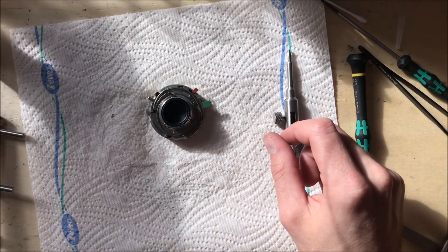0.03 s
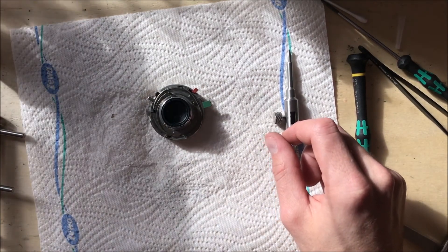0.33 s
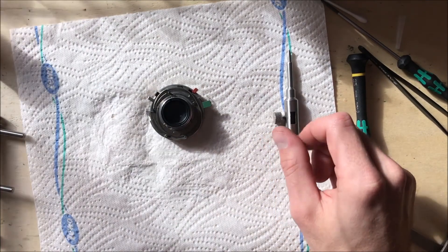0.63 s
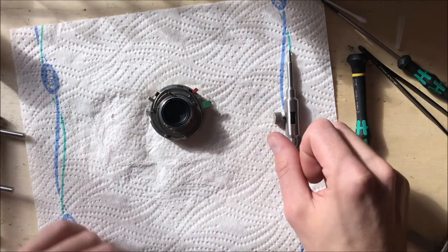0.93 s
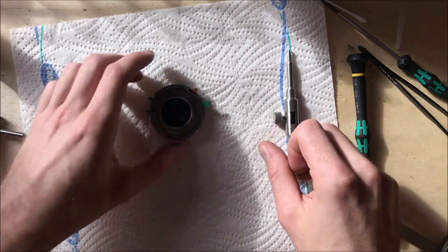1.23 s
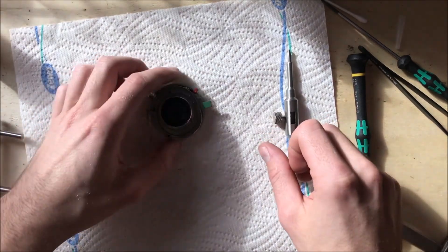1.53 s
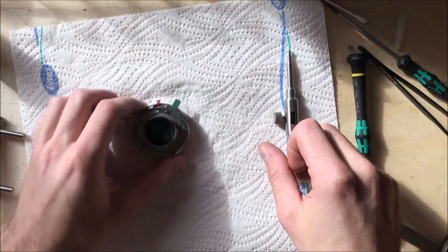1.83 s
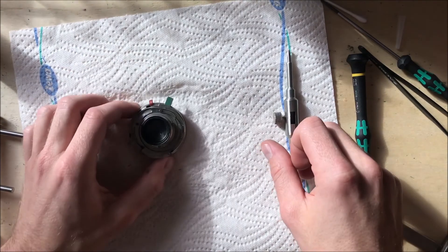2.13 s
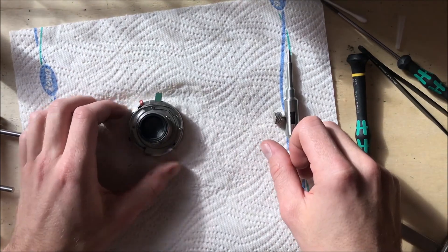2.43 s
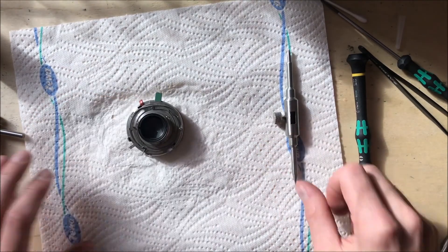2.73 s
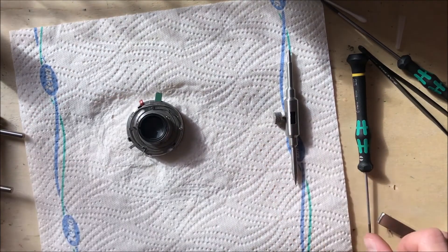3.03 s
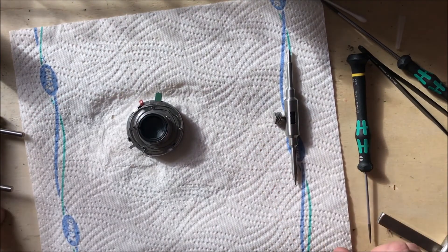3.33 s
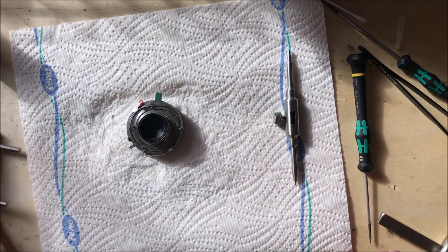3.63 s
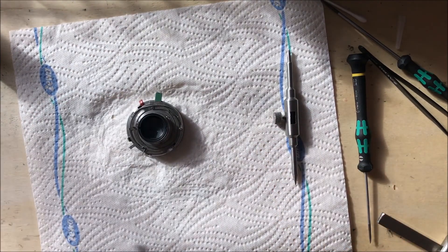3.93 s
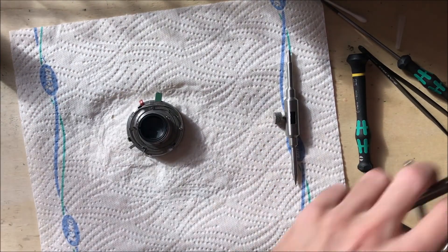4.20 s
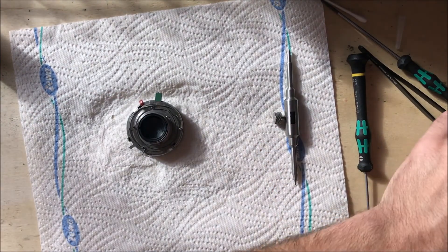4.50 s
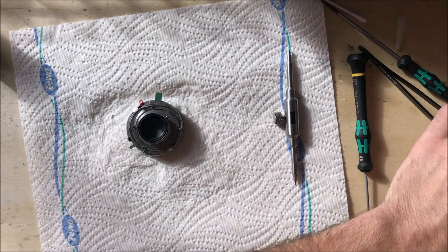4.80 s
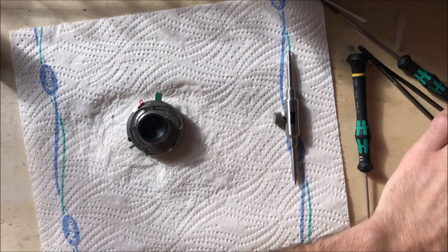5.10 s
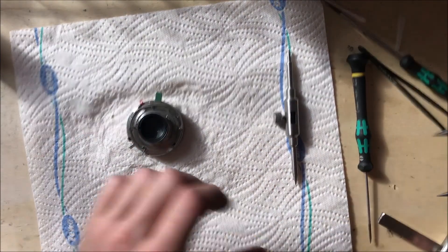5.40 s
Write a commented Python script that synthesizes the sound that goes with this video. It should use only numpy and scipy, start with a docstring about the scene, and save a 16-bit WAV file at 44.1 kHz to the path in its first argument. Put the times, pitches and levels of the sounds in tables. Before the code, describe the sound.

Small steel parts scrape and click in a quick cluster. A camera shutter is nudged over a paper towel with a soft tap and faint rustling, and things drag quietly across a wooden bench. Near the end a screwdriver rattles down among other tools, followed by a loud wooden knock and a last clack. The sounds are close, in a small room with a faint hum and hiss.

```python
"""Tools knock on a wooden repair bench, close by in a small room; the boards ring with low modes.
Small steel parts click, scrape and rock flat, and a screwdriver rattles down among other tools.
Things drag over the wood, and a hand nudges a camera shutter over a paper towel, whose fibres
hiss and tick. A faint, brief click sounds at the very start; a faint hum and hiss lie underneath."""
import sys
import numpy as np
from scipy import signal
from scipy.fft import rfft, irfft, next_fast_len
from scipy.io import wavfile
from scipy.ndimage import map_coordinates

SR = 44100
rng = np.random.default_rng(int(sys.argv[2]) if len(sys.argv) > 2 else 0)


def dump(signal):
    """Clip the signal to [-1, 1] and save it as 16-bit WAV at the path in sys.argv[1]."""
    limited = np.clip(np.atleast_2d(signal).T, -1, 1)
    pcm = np.round(limited * 32767).astype(np.int16)
    wavfile.write(sys.argv[1], SR, pcm)


N = 240556
TIME_S = np.arange(N) / SR
RING_S = np.arange(SR // 2) / SR  # time axis of one hit

# modes of small steel parts: freq_hz, level_db, t60_s
STEEL_MODES = [(1128, -8, 0.11), (1323, -6, 0.13), (1542, -1.5, 0.07), (2048, -2, 0.054),
               (2580, -1.5, 0.046), (2946, -2, 0.059), (3733, 6.5, 0.028), (4137, 4.5, 0.033),
               (4960, -2.5, 0.029), (5440, 2, 0.036), (5950, 1, 0.023), (7350, -9, 0.02),
               (10020, 3.5, 0.025), (10880, 0, 0.021), (12300, -9, 0.03)]
# paper towel friction spectrum: freq_hz, gain_db
TOWEL_SPECTRUM = [(200, -38), (1000, 3), (2800, 3), (4200, 3), (7000, 0.5), (10000, -2), (15000, 2)]


def knocks():
    """Tools and fingers strike the bench with some weight behind them."""
    # blunt contacts: start_s, knock_db, board_db, pitch_hz, damping (1 = free)
    contacts = [(0.144, -44.5, -58, 1230, 1.7), (0.2309, -46, -52, 1040, 2.3),
                (0.2336, -43, -42.5, 660, 2.8), (0.2391, -49, -67, 1120, 3), (0.344, -61, -54, 700, 2),
                (0.9017, -58, -87, 1630, 2), (0.9581, -64.5, -90, 1480, 2), (1.3414, -59.5, -70, 1190, 1.6),
                (2.614, -60, -43.5, 760, 1.3), (2.809, -63, -64, 920, 1.2), (3.1906, -69.5, -62, 1550, 3.4),
                (3.26, -64.5, -55, 1130, 2.3), (3.387, -51, -58.5, 1070, 1.2), (3.468, -72, -54, 790, 1.9),
                (3.513, -72, -55, 1000, 1.6), (3.731, -54, -75, 1400, 1.4), (4.9557, -17, -28, 1013, 1),
                (5.1258, -45, -51.5, 1290, 2.1), (5.3882, -49.5, -74, 1380, 1.5)]
    out = np.zeros(N)
    for start_s, knock_db, board_db, pitch_hz, damping in contacts:
        add(out, start_s, knock(knock_db, board_db, pitch_hz, damping) + thump(board_db, damping))
    return out


def knock(knock_db, board_db, pitch_hz, damping, contact_s=0.00006, board_rise_s=0.0025):
    """A cushioned contact gives a few cycles of knock; the boards ring on."""
    # knock spectrum at a pitch of 1000 Hz: freq_hz, gain_db
    spectrum = [(60, -17.5), (250, -16.5), (550, -9.5), (780, -2), (1000, 0.5), (1300, -3.5), (1620, -20),
                (2400, -24), (3500, -26), (5000, -42), (7000, -46.5), (15000, -51)]
    pulse = RING_S * np.exp(-RING_S / contact_s)
    push = pulse / pulse.sum() + amp(-30.5) * crack(t60_s=0.032)
    body = causal(push, lambda hz: along(spectrum, hz * 1000 / pitch_hz))
    # bending waves disperse in wood: the knock swells over its first cycle
    pole = np.exp(2 * np.pi * pitch_hz * (1j - .45) / SR)
    allpass = np.poly([pole, pole.conjugate()]).real
    body = unit_onset(signal.lfilter(allpass[::-1], allpass, body))
    board = boards(damping) * (1 - np.exp(-RING_S / board_rise_s))
    return amp(knock_db) * body + amp(board_db) * board


def thump(board_db, damping, cutoff_hz=154, offset_db=-6):
    """A slow, heavy push reaches only the lowest bench modes."""
    low = signal.sosfilt(signal.butter(3, cutoff_hz, fs=SR, output="sos"), boards(damping))
    return amp(board_db + offset_db) * low / np.abs(low).max()


def boards(damping):
    """The bench rings; a resting hand deadens and shifts its modes."""
    # bench top modes: freq_hz, level_db, t60_s
    modes = [(47.6, -27, 0.35), (128.3, -3.5, 0.26), (152.7, -2.5, 0.24), (187, -14.5, 0.25),
             (274, 6.5, 0.17), (318.7, -1, 0.15), (405, -1, 0.13), (437, -2.5, 0.09), (514, -7, 0.075),
             (588, -8.5, 0.091), (685, -10.5, 0.097), (772, -2.5, 0.1), (971, -5.5, 0.15),
             (1272, -3.5, 0.065), (1790, -18.5, 0.074), (2412, -10, 0.095), (3450, -23, 0.058)]
    hand_load = max(1 - 1 / damping, 0)
    return ring(modes, scatter_db=2, detune=0.04 * hand_load, damping=damping)


def landings(touch_count=4, weight_gain_db=10, thump_boost_db=3):
    """A part rocks flat: its knocks soften as its weight comes onto the boards."""
    # edge landings: start_s, settle_s, first_knock_db, fade_db, last_board_db, pitch_hz, damping
    parts = [(1.6794, 0.024, -40.5, 16, -40, 1280, 1.35), (5.432, 0.0138, -24.5, 32, -19, 976, 1.4)]
    out = np.zeros(N)
    for start_s, settle_s, first_knock_db, fade_db, last_board_db, pitch_hz, damping in parts:
        for progress in np.linspace(0, 1, touch_count):
            touch_s = start_s + settle_s * progress ** 1.4  # gaps widen
            knock_db = first_knock_db - fade_db * progress ** 4.5
            board_db = last_board_db - weight_gain_db * (1 - progress)
            hit = knock(knock_db, board_db, pitch_hz, damping)
            add(out, touch_s, hit + thump(board_db + thump_boost_db, damping))
    return out


def clicks(rise_db_per_oct=2.5, fall_db_per_oct=11, repeat_s=0.0093, repeat_loss_db=11):
    """Each click is a crack and a brief ring, repeated once more softly."""
    # a faint, brief click at the very start; the later ones are steel parts that rebound
    # clicks: start_s, level_db, peak_hz, t60_s
    events = [(0.005, -56, 3840, 0.03), (0.1024, -45, 7060, 0.01), (0.127, -44.5, 2510, 0.054),
              (0.1441, -38, 5460, 0.083), (0.1552, -39.5, 3370, 0.079), (0.209, -54.5, 4200, 0.027),
              (0.2353, -55.5, 5200, 0.03), (0.3214, -35.5, 3700, 0.021), (0.3424, -43.5, 4120, 0.04),
              (0.3749, -32.5, 4300, 0.023), (1.7032, -48.5, 5970, 0.019), (2.6123, -46.5, 4170, 0.07),
              (3.6046, -68.5, 12000, 0.008), (4.144, -66, 4660, 0.024), (5.1244, -56, 5130, 0.013),
              (5.4322, -30, 4600, 0.014), (5.4355, -30.5, 12400, 0.019)]
    out = np.zeros(N)
    for start_s, level_db, peak_hz, t60_s in events:
        def colour_db(hz):
            octaves = np.log2((hz + 1) / peak_hz)
            bass_cut_db = -10 * np.log10(1 + (950 / (hz + 1)) ** 6)
            return np.minimum(rise_db_per_oct * octaves, -fall_db_per_oct * octaves) + bass_cut_db
        for delay_s, loss_db in [(0, 0), (repeat_s, repeat_loss_db)]:
            hit = crack(t60_s) + amp(-5.5) * ring(STEEL_MODES, scatter_db=3.5, detune=0.015)
            add(out, start_s + delay_s, amp(level_db - loss_db) * unit_onset(causal(hit, colour_db)))
    return out


def screwdriver():
    """A dropped screwdriver chatters, its shaft and handle ring, the boards answer faintly."""
    # contacts with other tools: start_s, level_db
    taps = [(4.6342, -30.5), (4.638, -33), (4.658, -47), (4.6976, -46.5)]
    # chatter spectrum: freq_hz, gain_db
    spectrum = [(200, -31), (750, -12.5), (1080, -4.5), (1700, -4), (2900, 0.5), (3400, -10), (4100, -2.5),
                (5000, -10.5), (7000, -13.5), (9700, -16), (10600, -19.5), (16000, -25.5)]
    # screwdriver modes: freq_hz, level_db, t60_s
    modes = [(1082, 0, 0.045), (1330, 2, 0.022), (1830, -4, 0.05), (2433, 1, 0.045), (2902, 0, 0.04),
             (3000, 5, 0.022), (4020, -3, 0.03), (5367, -11, 0.035), (7100, -13, 0.03), (9152, -14, 0.04)]
    out = np.zeros(N)
    for start_s, level_db in taps:
        chatter = unit_onset(causal(crack(t60_s=0.034), lambda hz: along(spectrum, hz)))
        shaft = ring(modes, scatter_db=2.5, detune=0.005)
        tool = unit_onset(chatter + amp(-0.5) * shaft)
        add(out, start_s, amp(level_db) * (tool + amp(-31.5) * boards(damping=1)))
    return out


def steel_scrapes():
    """Steel sticks and slips on steel; the slips keep its modes ringing."""
    # slides: peak_s, rise_s, fall_s, level_db, cutoff_hz
    slides = [(0.075, 0.08, 0.017, -63, 5000), (0.091, 0.0095, 0.02, -42, 9400),
              (0.1002, 0.0036, 0.0076, -37.5, 14300), (2.305, 0.011, 0.028, -61.5, 3670),
              (5.381, 0.067, 0.039, -64.5, 4330)]
    # steel friction spectrum: freq_hz, gain_db
    spectrum = [(500, -22), (900, -26), (1200, -6), (1700, -14), (2600, 9), (3200, 2.5), (4150, 8),
                (5000, -4), (7500, 7), (9500, -11), (13000, -1), (16000, -23)]
    out = np.zeros(N)
    for peak_s, rise_s, fall_s, level_db, cutoff_hz in slides:
        slips = noise(spectrum) * unit(amp(4.2 * wobble(rate_hz=700)))
        response = ring(STEEL_MODES, scatter_db=2, detune=.01)
        ringing = unit(signal.fftconvolve(slips, response)[:N])
        scrape = filtered(slips + amp(-5.5) * ringing, lambda hz: 1 / np.sqrt(1 + (hz / cutoff_hz) ** 6))
        out += amp(level_db) * swell(peak_s, rise_s, fall_s) * unit(scrape)
    return out


def drags(attack_share=0.29, release_share=0.38):
    """Things catch unevenly on the wood; the boards drone most at mid-stroke, where pressure peaks."""
    # drag strokes: start_s, length_s, rub_db, drone_db
    strokes = [(1.805, 0.17, -66, -68.5), (2.14, 0.41, -70, -69), (2.548, 0.28, -63.5, -60.5),
               (3.328, 0.069, -59, -79), (3.427, 0.2, -65, -55.5), (3.582, 0.18, -53, -47.5),
               (4.597, 0.39, -56.5, -71), (5.386, 0.04, -49.5, -64)]
    # wood friction spectrum: freq_hz, gain_db
    rub_spectrum = [(200, -3.5), (500, -12), (1100, 2), (1600, -5), (2400, -9.5), (4500, -13), (8000, -22),
                    (16000, -29)]
    # board drone spectrum: freq_hz, gain_db
    drone_spectrum = [(30, -36), (90, -20), (122, 4), (155, -1), (195, -14), (240, 1), (280, 2), (340, -14),
                      (410, -8), (560, -22), (900, -26), (2000, -60)]
    rub_gain, drone_gain = np.zeros((2, N))
    for start_s, length_s, rub_db, drone_db in strokes:
        progress = (TIME_S - start_s) / length_s
        ramp = np.clip(np.minimum(progress / attack_share, (1 - progress) / release_share), 0, 1)
        speed = np.sin(np.pi / 2 * ramp) ** 2
        rub_gain += amp(rub_db) * speed
        drone_gain += amp(drone_db) * swell(start_s + length_s / 2, 0.2 * length_s, 0.2 * length_s)
    catching = unit(amp(2.2 * wobble(rate_hz=200) + 1.8 * wobble(rate_hz=45)))
    return rub_gain * catching * noise(rub_spectrum) + drone_gain * noise(drone_spectrum)


def paper_towel():
    """The towel hisses and crackles under the hand and the shutter."""
    # strokes over the paper: peak_s, rise_s, fall_s, level_db
    strokes = [(1.4, 0.14, 0.22, -72), (1.73, 0.068, 0.044, -67), (1.88, 0.065, 0.052, -63),
               (2.039, 0.032, 0.052, -65), (2.28, 0.05, 0.1, -72), (2.66, 0.099, 0.088, -55),
               (3.35, 0.058, 0.16, -65), (3.8, 0.062, 0.23, -74.5)]
    unsteady = amp(1.6 * wobble(rate_hz=45))
    pressure = unsteady * sum(amp(level_db) * swell(*timing_s) for *timing_s, level_db in strokes)
    return pressure * unit(noise(TOWEL_SPECTRUM) + amp(-3) * fibre_ticks())


def fibre_ticks(rate_hz=380, spread_db=4.5, t60_s=0.005):
    """Embossed paper fibres catch and let go at random."""
    released = rng.random(N) < rate_hz / SR
    size_db = spread_db * np.clip(rng.standard_normal(N), -2, 2)
    envelope = signal.fftconvolve(released * amp(size_db), amp(-60 * RING_S / t60_s))[:N]
    return unit(envelope * noise(TOWEL_SPECTRUM))


def room(x, predelay_s=0.005):
    """Small-room reverberation: a noise tail with a decay time per band."""
    # room decay: freq_hz, t60_s
    decay = [(120, 0.37), (350, 0.53), (1100, 0.61), (3500, 0.55), (8000, 0.31), (15000, 0.61)]
    # reverberation level: freq_hz, gain_db
    send = [(100, -8.5), (300, -5), (700, -10.5), (1100, -12), (1600, -8.5), (2500, -10), (4200, -14.5),
            (6500, -12), (12000, -17), (16000, -18)]
    hz, time_s, bands = signal.stft(rng.standard_normal(SR), SR, nperseg=256)
    t60_s = along(decay, hz)[:, None]
    envelope = amp(-60 * time_s / t60_s + along(send, hz)[:, None])
    energy_norm = np.sqrt(2 * np.log(1000) / (t60_s * SR))
    tail = signal.istft(bands * envelope * energy_norm, SR, nperseg=256)[1]
    return signal.fftconvolve(x, np.pad(tail, (round(predelay_s * SR), 0)))[:N]


def background(hiss_db=-65):
    """Steady hiss and a wavering low hum."""
    # hum tones: freq_hz, rms_db
    tones = [(46, -79), (100, -75), (148, -82.5)]
    # noise floor spectrum: freq_hz, gain_db
    spectrum = [(15, -32), (25, -14), (44, -5), (65, -7), (98, 0), (123, -7), (146, -5), (250, -11),
                (400, -17), (1000, -21.5), (2000, -26.5), (5000, -31), (10500, -35.5), (15000, -33.5)]
    hum = np.zeros(N)
    for freq_hz, rms_db in tones:
        gain = np.sqrt(2) * amp(rms_db + 2.2 * wobble(rate_hz=6.7))
        hum += gain * np.sin(2 * np.pi * freq_hz * TIME_S + 0.21 * wobble(rate_hz=6))
    return amp(hiss_db) * noise(spectrum) + hum


def ring(modes, scatter_db, detune, damping=1):
    """Damped modes, with strengths and tuning drawn anew for each call."""
    hz, level_db, t60_s = np.transpose(modes)[:, :, None]
    polarity = (-1) ** np.arange(len(hz))[:, None]
    strength = polarity * amp(level_db + scatter_db * rng.standard_normal(hz.shape))
    hz = hz * (1 + detune * rng.standard_normal(hz.shape))
    decay = amp(-60 * RING_S * damping / t60_s)
    return unit_onset(np.sum(strength * decay * np.sin(2 * np.pi * hz * RING_S), axis=0))


def crack(t60_s, attack_s=0.00048):
    """A dying noise burst, like the dense modes of a small hard part."""
    envelope = amp(-60 * RING_S / t60_s) * (1 - np.exp(-RING_S / attack_s))
    return unit_onset(rng.standard_normal(len(RING_S)) * envelope)


def swell(peak_s, rise_s, fall_s):
    """Bell-shaped pressure of one stroke."""
    width_s = np.where(TIME_S < peak_s, rise_s, fall_s)
    return np.exp(-.5 * ((TIME_S - peak_s) / width_s) ** 2)


def wobble(rate_hz):
    """Smooth random curve with knots at rate_hz."""
    return map_coordinates(rng.standard_normal(int(N * rate_hz / SR) + 4), [TIME_S * rate_hz])


def noise(spectrum):
    """Coloured noise of rms 1."""
    return unit(filtered(rng.standard_normal(N), lambda hz: amp(along(spectrum, hz))))


def filtered(x, gain):
    """Zero-phase filter with response gain(hz)."""
    size = next_fast_len(len(x) + SR // 2)
    return irfft(rfft(x, size) * gain(np.fft.rfftfreq(size, 1 / SR)), size)[:len(x)]


def causal(x, colour_db):
    """Minimum-phase filter: colours a hit with no smear ahead of its onset."""
    size = 2 * len(x)
    gain = amp(colour_db(np.fft.rfftfreq(size, 1 / SR)))
    cepstrum = irfft(np.log(gain + 1e-6))
    cepstrum[1:len(x)] *= 2
    cepstrum[len(x) + 1:] = 0
    return irfft(rfft(x, size) * np.exp(rfft(cepstrum)))[:len(x)]


def along(points, hz):
    """Interpolate (freq_hz, value) points on a log frequency axis."""
    freq_hz, values = np.transpose(points)
    return np.interp(np.log(hz + 1), np.log(freq_hz + 1), values)


def amp(db):
    """Decibels to gain."""
    return 10 ** (np.asarray(db) / 20)


def unit(x):
    """Scale to rms 1."""
    return x / np.sqrt(np.mean(x ** 2) + 1e-20)


def unit_onset(x):
    """Scale to rms 1 over the first 10 ms."""
    return x / np.sqrt(np.mean(x[:SR // 100] ** 2) + 1e-20)


def add(track, start_s, sound):
    """Mix a sound in at start_s."""
    start = max(round(start_s * SR), 0)
    track[start:start + len(sound)] += sound[:max(N - start, 0)]


def scene():
    """Bench work, its reverberation and the background, in mono."""
    layers = [knocks() + landings(), clicks(), screwdriver(), steel_scrapes() + drags() + paper_towel()]
    return (sum(x + room(x) for x in layers) + background())[None]


def record(dry):
    """Brick-wall low-pass at 16 kHz."""
    return np.array([filtered(x, lambda hz: hz < 16000) for x in dry])


dry = scene()
out = record(dry)
dump(out)
```